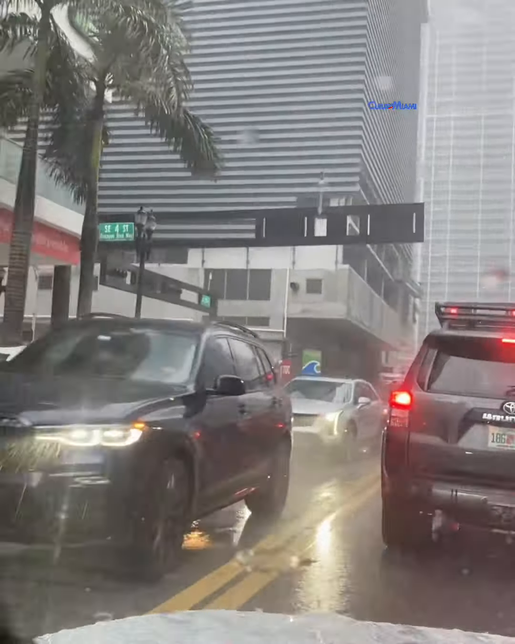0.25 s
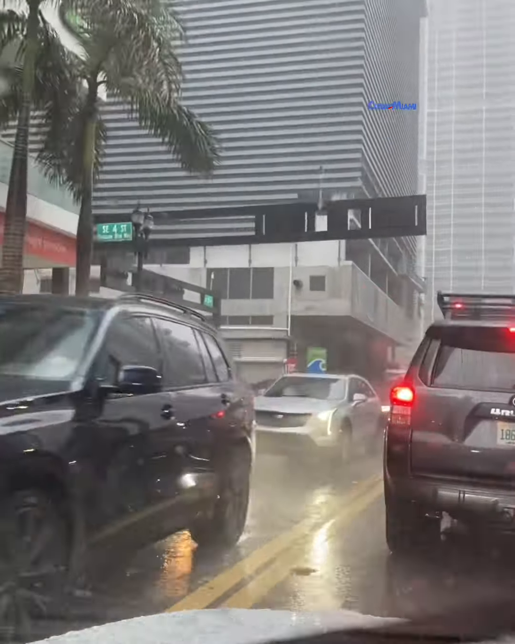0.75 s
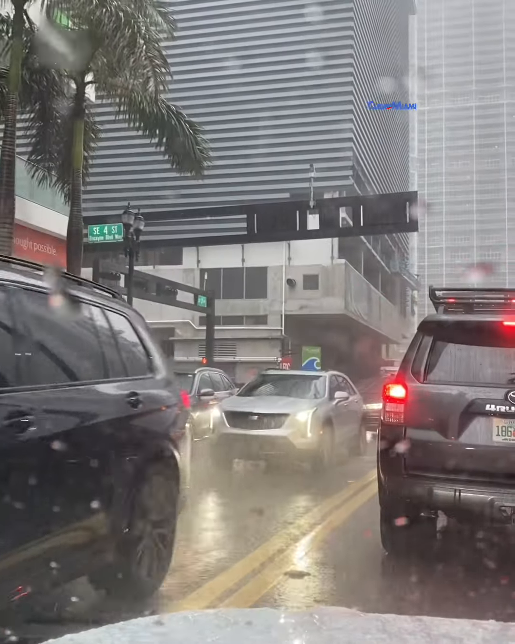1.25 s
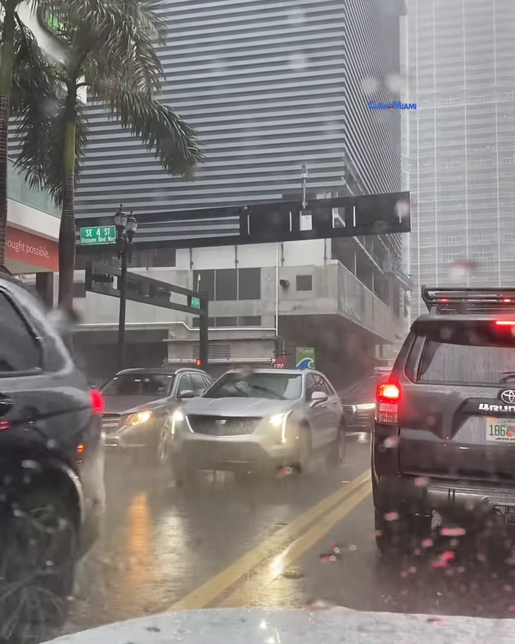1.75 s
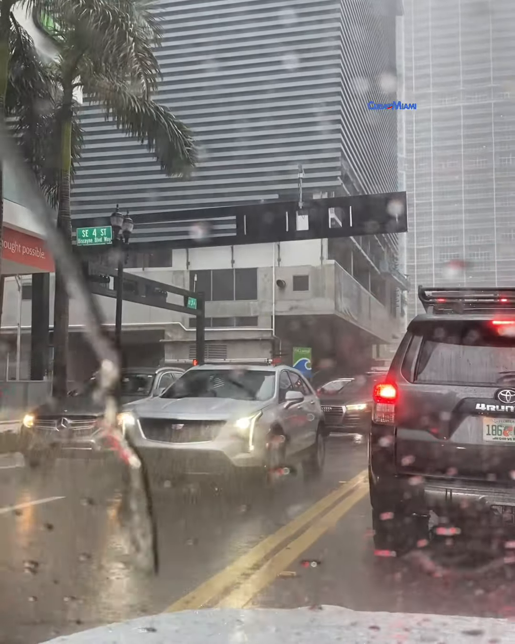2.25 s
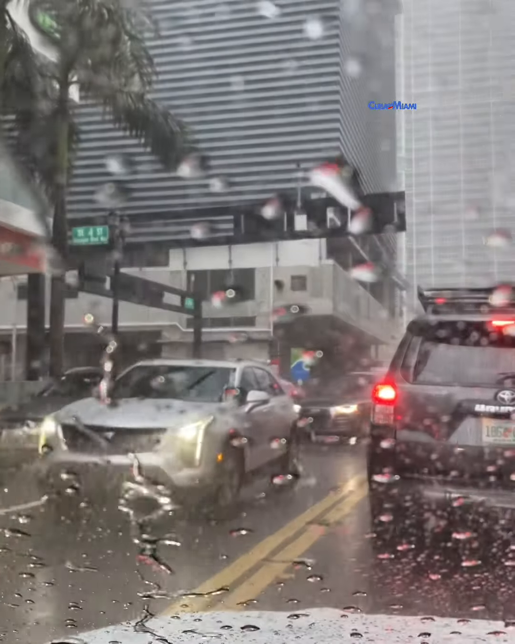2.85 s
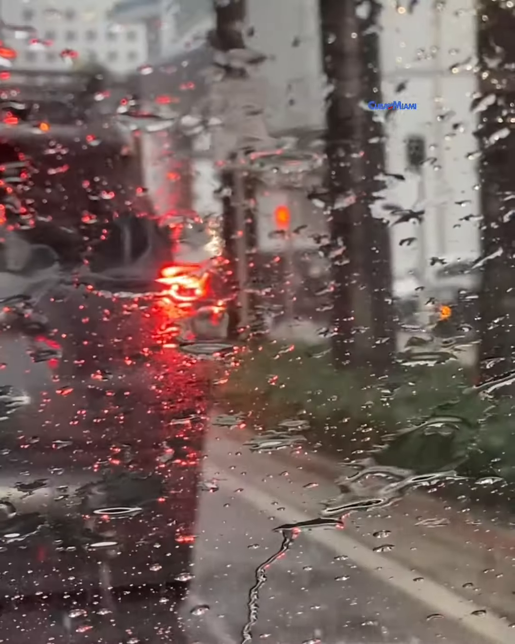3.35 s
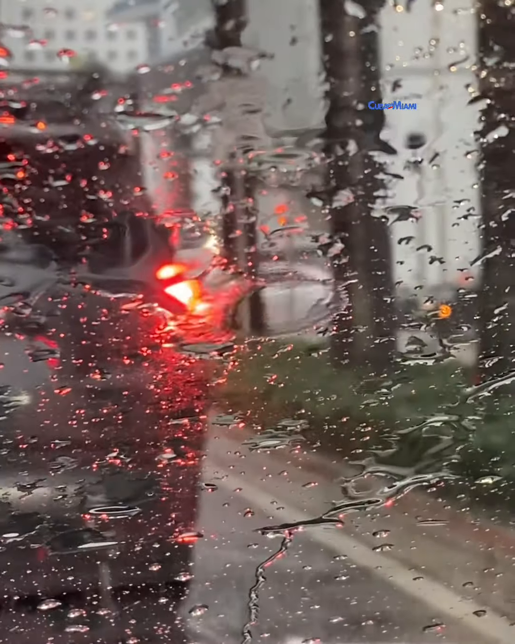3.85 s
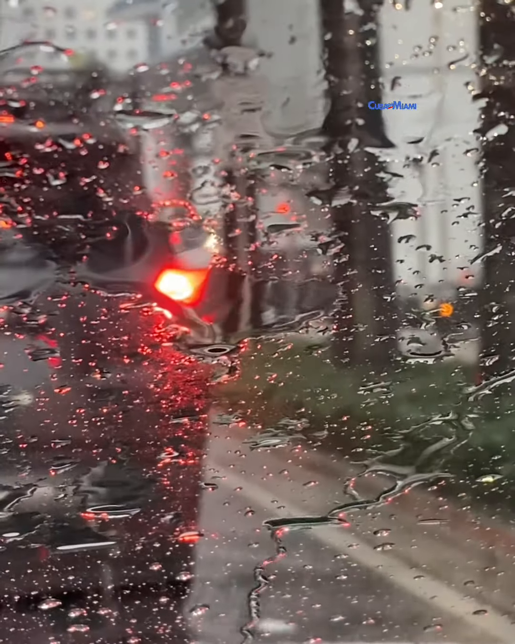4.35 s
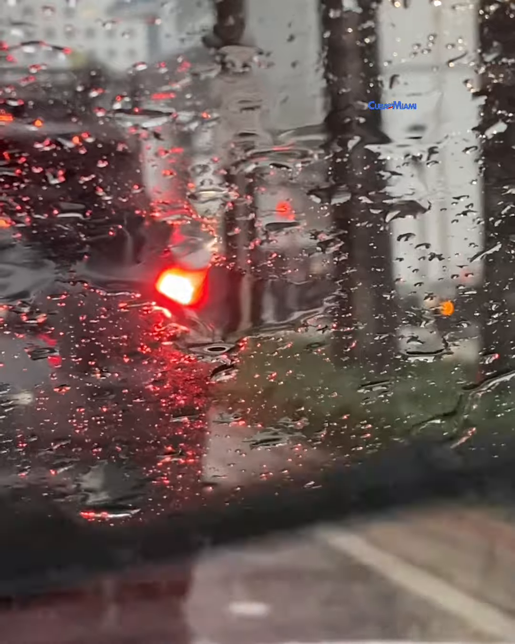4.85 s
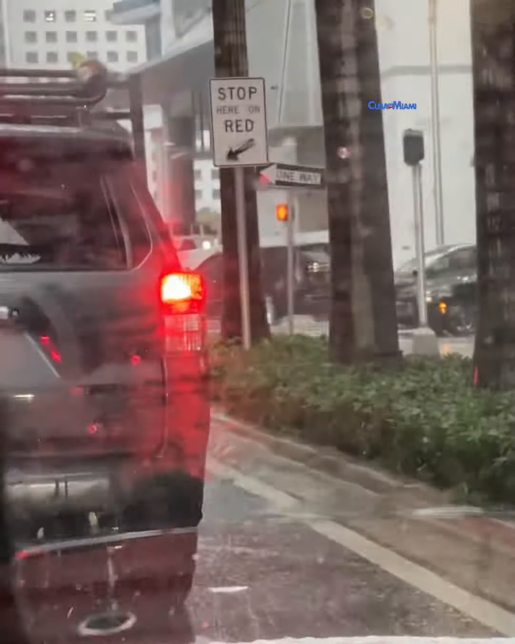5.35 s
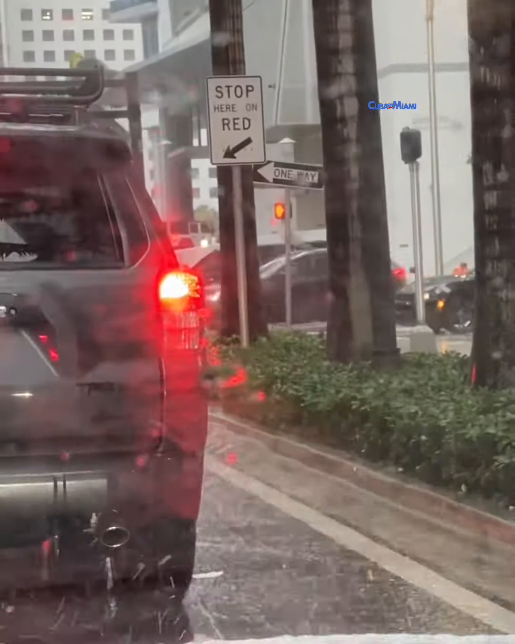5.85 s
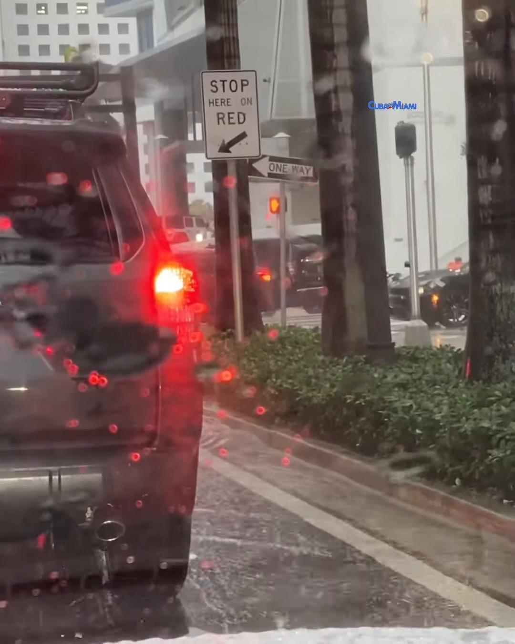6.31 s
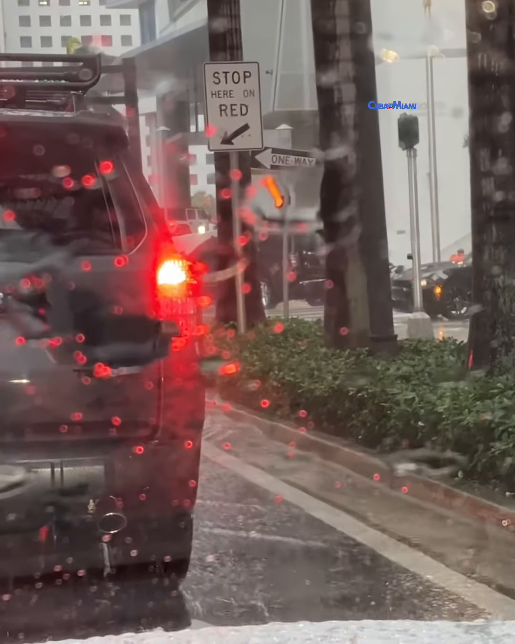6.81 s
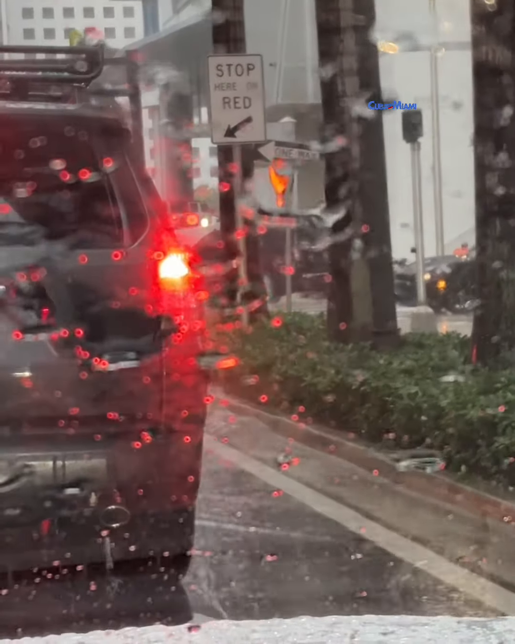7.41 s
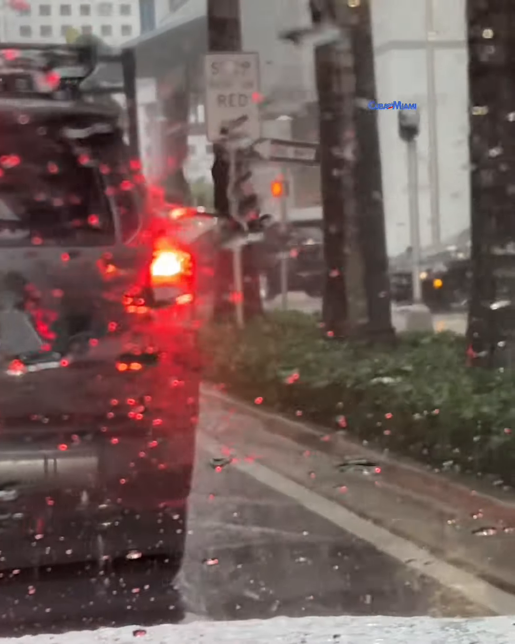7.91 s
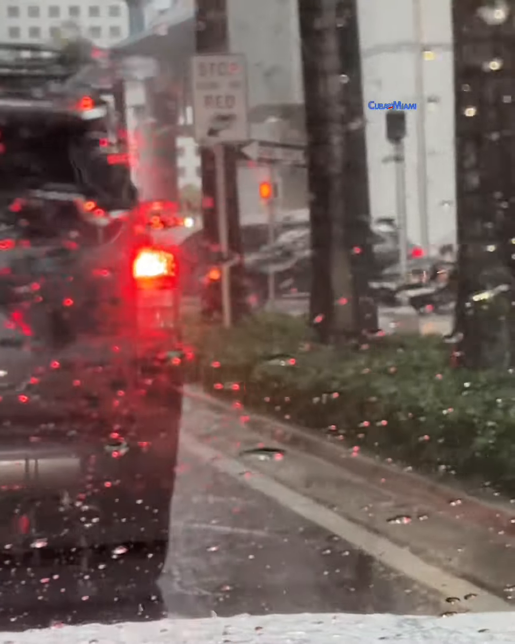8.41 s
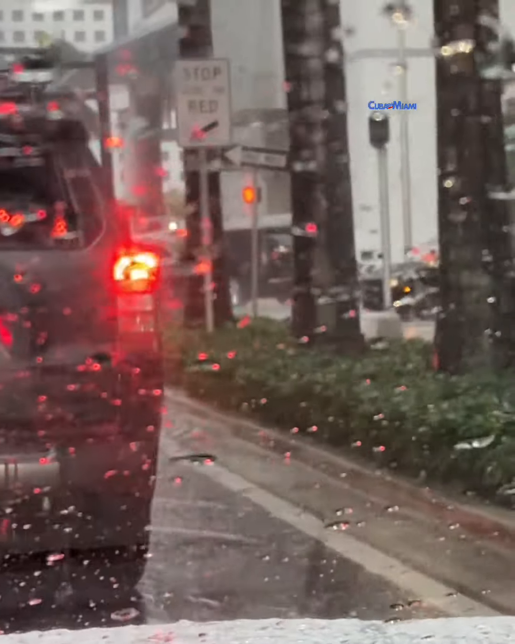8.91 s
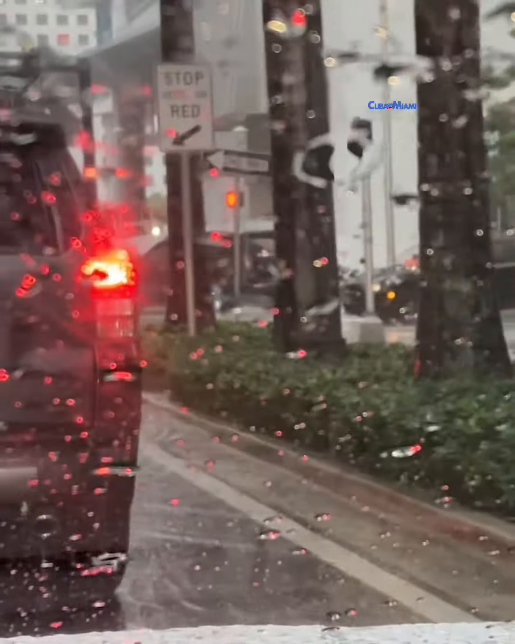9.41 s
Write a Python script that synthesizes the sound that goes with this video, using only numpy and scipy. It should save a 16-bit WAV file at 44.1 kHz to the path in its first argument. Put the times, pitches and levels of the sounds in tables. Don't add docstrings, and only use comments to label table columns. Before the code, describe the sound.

Heard inside a car in rainy traffic, with a close stereo microphone. From 0 to 3.1 s heavy rain makes a dense bright hiss on the windshield, with duller drumming on the roof panel, above a low cabin boom and idling engine. Wiper knocks come at about 0.25 and 0.5 s, the blade turning with a low double clunk and rubber slap, then a parking thump near 1.15 s. The rain swells from 2 s, with sharp fat splats around 2.1 s. At 3.1 s it cuts abruptly to a calmer scene: softer, thinner hiss, weaker rumble, individual ticks and splats. A deep wiper lift-off thud lands around 4.6 s, the turn clunks at 5.4 s, and parking thumps follow at 6 s; the hiss briefly brightens after 5.2 s. From 7 s rain thins to scattered ticks, small plinks and soft roof thuds until about 9.7 s.

```python
import sys
import numpy as np
from scipy import signal
from scipy.fft import rfft, irfft, next_fast_len
from scipy.io import wavfile
from scipy.ndimage import uniform_filter1d

SR = 44100
rng = np.random.default_rng(int(sys.argv[2]) if len(sys.argv) > 2 else 0)


def to_wav(sig):
    pcm = np.clip(np.atleast_2d(sig), -1, 1) * 32767
    pcm = np.round(pcm).astype(np.int16)
    wavfile.write(sys.argv[1], SR, pcm.T)


def convert_level_to_amplitude(level_db):
    exponent = np.asarray(level_db, float) / 20
    return 10 ** exponent


N = 426447
CUT_S = 3.102

# time_s, level_db
RAIN = [(0.0, -50), (1.25, -52.5), (2.1, -47), (2.7, -45.5), (3.1, -49.5), (3.105, -56.5), (3.37, -61.5),
        (3.4, -55), (4.3, -58.5), (4.45, -66), (4.74, -56.5), (5.18, -58.5), (5.23, -52.5), (6.2, -56),
        (7.04, -57.5), (7.1, -61.5), (7.7, -62.5), (9.67, -59.5)]
# frequency_hz, density_db
GLASS = [
    [(800, -12), (1500, -3), (2000, 3), (2800, 4), (3100, 2.5), (4000, 2), (6000, -2.5), (8000, -6),
     (10000, -10), (12500, -12.5), (14000, -19), (15500, -27.5)],
    [(800, -23), (1500, -5.5), (2000, 1), (2500, -0.5), (3100, 0), (4000, -2), (6000, -4.5), (8000, -8.5),
     (10000, -11), (12500, -15.5), (14000, -21), (15500, -29.5)],
]
# frequency_hz, density_db
ROOF = [
    [(120, -37), (200, -4.5), (296, -2.5), (393, -7.5), (437, -2.5), (471, -6), (518, -3.5), (711, -7),
     (842, -2), (986, -10), (1330, -9), (1880, -18), (2500, -22.5), (3250, -58), (5500, -120)],
    [(120, -64), (200, -2), (232, -10), (258, -3.5), (325, -8), (428, -6), (540, -6), (1060, -8.5),
     (1590, -13), (1800, -14), (2500, -24), (3250, -75), (5500, -120)],
]
# frequency_hz, density_db
BOOM = [
    [(12, -33), (20, -27), (37, 1), (54, 5.5), (81, 7.5), (103, 0.5), (156, 4.5), (193, -2.5), (296, -9.5),
     (344, -17.5), (400, -20), (520, -33), (880, -120)],
    [(12, -32), (22, -22), (31, -28), (38, 1), (46, 0), (56, 1.5), (81, -1.5), (102, -4.5), (150, -10),
     (198, -12), (258, -17.5), (400, -23.5), (520, -30.5), (880, -120)],
]

# start_s, peak_db,
# thud_below_splash_db
DROPS = [(0.1271, -29, -4), (0.1665, -32, -7), (0.2463, -32, -4), (0.7971, -36, -14), (0.8175, -29, -15),
         (1.0844, -32, -12), (1.1114, -32, -8), (1.1453, -36, -11), (1.2855, -33, -6), (1.3823, -40, -12),
         (1.4167, -38, -8), (1.4331, -28.5, -12), (1.5529, -32, -6), (2.0009, -40, -7), (2.0298, -35, -4),
         (2.0936, -27, -9.5), (2.1231, -23.5, -15), (2.363, -30, -6), (2.6589, -32, -5), (3.026, -30.5, -5),
         (3.1682, -37, -14), (3.3927, -35, -14.5), (3.5029, -34.5, -15), (3.5319, -32, -11.5),
              (3.6162, -35, -15), (3.7903, -35, -7.5), (3.8916, -40, -4), (4.0163, -43, -12),
              (4.0741, -33.5, -11), (4.1255, -37.5, -7.5), (4.3455, -42, -12), (4.5173, -40.5, -10),
              (4.5555, -35.5, -14), (4.6274, -41, 2.5), (4.7197, -38.5, -14), (4.7651, -42, -10),
              (4.8653, -36.5, -18), (5.218, -38, -5), (5.3812, -37, -15), (5.5383, -41, -6),
              (5.6715, -38.5, -5), (5.8007, -40, -6), (5.9993, -37, -7.5), (6.1305, -39, -11),
              (6.1659, -36, -13), (6.2148, -42, -6), (6.3754, -38, -9), (6.4293, -39, -10),
              (6.5959, -40, -6), (6.9462, -35.5, -16),
         (7.1451, -39, -6), (7.1855, -36.5, -11), (7.2279, -47, -12), (7.283, -37, -12),
              (7.4839, -44.5, -8), (7.5747, -45, -12), (7.661, -39.5, -7), (7.7717, -50, -14),
              (7.7832, -40.5, -15), (7.8251, -35, -16), (7.9244, -37.5, -7.5), (7.9622, -40.5, -8),
              (8.0117, -41, -6.5), (8.327, -40.5, -6), (8.5458, -34.5, -13), (8.7894, -44, -12),
              (8.7974, -34, -17), (8.9657, -38.5, -6.5), (9.0129, -42, -9), (9.1072, -41.5, -6),
              (9.242, -37, -13), (9.2713, -41, -6), (9.2848, -32, -10), (9.3426, -38.5, -9.5),
              (9.3701, -41, -11), (9.387, -32, -15), (9.5771, -40, -11), (9.5963, -36, -7)]
# start_s, peak_db, t60_s
FAT_DROPS = [
    (2.488, -28, 0.053),
    (6.601, -40, 0.07),
    (6.858, -41, 0.2),
    (6.885, -40, 0.15),
    (7.004, -36.5, 0.11),
    (9.392, -43, 0.058),
]
# start_s, peak_db, pitch_hz, ring_s
DRIPS = [
    (6.8096, -54, 1940, 0.006),
    (6.832, -45, 1840, 0.0039),
    (9.273, -51, 1750, 0.006),
]

# turn_s, strength_db
WIPES = [
    (.469, -1.5),
    (5.366, -2.0),
]
# from_turn_s, peak_db, t60_s
SLAPS = [
    (-.834, -35.5, .15),
    (-.728, -30, 0.094),
    (-.226, -29, 0.14),
    (-.002, -25, .06),
    (.659, -33, 0.048),
]
# from_turn_s, peak_db, pitch_hz, ring_s
SHELL_KNOCKS = [(-.836, -29, 74, .018), (-.766, -26, 74, .013), (-.725, -11, 91.6, .015),
                (-.656, -24, 98, 0.021), (-.586, -25, 63, 0.018), (-.535, -28, 68, 0.0074),
                (-.496, -28, 60, .013), (-.34, -28, 91.6, 0.022), (0.0, -19, 79, 0.011),
                (.02, -16.5, 87, 0.012), (.061, -20.5, 86, .011), (.103, -25.5, 81, 0.019),
                (.643, -25.5, 81.3, 0.015), (.672, -20, 72.3, 0.0094), (.695, -20, 77, 0.01),
                (.72, -25.5, 62, 0.013), (.773, -30, 53.3, 0.033), (.177, -32.5, 105.4, 0.02),
                (-.27, -30, 72, 0.013)]
# from_turn_s, peak_db, pitch_hz, ring_s
GLASS_KNOCKS = [
    (-.81, -25.5, 151, .0075),
    (-.787, -28.5, 161, .01),
    (-.731, -24.5, 157, .0063),
    (-.226, -27, 176, 0.0084),
    (-.002, -23.5, 165, 0.008),
    (.015, -18.5, 162, 0.0082),
    (.044, -25.5, 169, .0061),
    (.659, -22.5, 131, 0.0071),
]
# from_turn_s, peak_db, pitch_hz, ring_s
BLADE_KNOCKS = [
    (-.835, -34.5, 294, 0.004),
    (-.731, -37, 160, .0044),
    (-.728, -34, 420, 0.0058),
    (-.223, -30, 244, 0.0025),
    (-.003, -23.5, 259, 0.0067),
    (.007, -19.5, 234, 0.0051),
]

# frequency_hz, likeness_0_to_1
LIKENESS = [
    [(60, 1), (150, 1), (270, 0.95), (450, 0.68), (700, 0.22), (1500, 0.16), (4500, 0), (5500, 0.71),
     (7000, .84), (15000, 1)],
    [(60, 1), (150, 1), (270, 0.96), (450, 0.6), (700, 0.33), (1700, 0.3), (2100, 0.7), (3500, .9),
     (4300, .7), (5200, .85), (7000, 0.86), (15000, 0.7)],
]
# frequency_hz, left_over_right_db
LEFT_TILT = [(150, 0), (380, 1), (700, 2), (1300, 2), (2400, .3), (4000, 0)]


def glass(gusts):
    wash = by_shot(2.15, 1.73)
    drops = patter(500, 3.95, 0.023, wash) * gusts
    return convert_level_to_amplitude(4.5 + rain_db()) * coloured(drops * patchy(1.42), GLASS)


def roof(gusts):
    drops = patter(300, 3.15, 0.039, 2.2) * gusts
    strength = convert_level_to_amplitude(2.5) * level((-46, -50), share=0.69, motor_db=1)
    return strength * coloured(drops * patchy(1.16), ROOF)


def splats():
    noise, clicks = rng.standard_normal((2, N)), np.zeros(N)
    bright = [[(hz, db + 2.5 * np.log2(hz / 3000)) for hz, db in spectrum] for spectrum in GLASS]

    drops = DROPS + stray_drops()
    start_s, peak_db = np.transpose(drops)[:2]
    clicks[(start_s * SR).astype(int)] = convert_level_to_amplitude(peak_db)
    tick = convert_level_to_amplitude(4.5) * clicks.std() * coloured(clicks, bright)

    drop_t60_s = 0.041
    spray = bursts([(s, db - 10.5, drop_t60_s) for s, db, _ in drops])
    thuds = [(s, db + 1.35 * min(thud_db, -5.0) + 2.5, 2.1 * drop_t60_s) for s, db, thud_db in drops]
    thuds += [(s, db - 1.5, t60_s) for s, db, t60_s in FAT_DROPS]
    return tick + spray * coloured(noise, bright) + bursts(thuds) * coloured(noise, ROOF)


def stray_drops():
    per_s, over_hiss_db, spread_db = 4, 14, 2.5
    wait, size, dull = rng.random((200, 3)).T
    start_s = np.cumsum(-np.log(wait) / per_s)
    peak_db = np.interp(start_s, *np.transpose(RAIN)) + over_hiss_db - spread_db * np.log(size + .05)
    rows = zip(start_s, peak_db + 2, -8 - 8 * dull)
    return [row for row in rows if CUT_S < row[0] < N / SR]


def plinks(count=900):
    out, t = np.zeros((2, N)), np.arange(900) / SR
    for when, pitch, size, side in rng.random((count, 4)):
        hz = 900 * 5.5 ** pitch
        decay_db = -60 * t * hz / 45
        ring = convert_level_to_amplitude(-4.0 * np.log(size + .01) + decay_db) * np.sin(2 * np.pi * hz * t)
        part = out[:, int(when * N):][:, :len(t)]
        part += np.outer([np.cos(side), np.sin(side)], ring)[:, :part.shape[1]]
    return convert_level_to_amplitude(rain_db() - 6.5) * out


def slaps():
    panel = [(120, -55), (250, 6), (400, 0), (700, -18.0), (1500, -33), (3000, -60)]  # frequency_hz, density_db
    noise, blows = rng.standard_normal((2, N)), swept(SLAPS)
    puff = uniform_filter1d(bursts(blows), size=200)
    shudder = bursts([(s, db - 4.5, t60_s + 0.23) for s, db, t60_s in blows])
    shudder = uniform_filter1d(shudder, size=400)
    return convert_level_to_amplitude(-5.5) * puff * coloured(noise, [panel, panel]) + shudder * coloured(noise, BOOM)


def wipers():
    out, t = np.zeros(N), np.arange(12000) / SR
    for start_s, peak_db, hz, ring_s in swept(SHELL_KNOCKS + GLASS_KNOCKS + BLADE_KNOCKS) + DRIPS:
        age = t / max(ring_s, .003)
        swell = (age * np.exp(1 - age)) ** 1.28
        knock = convert_level_to_amplitude(peak_db) * swell * np.sin(2 * np.pi * hz * t)
        part = out[round(start_s * SR):][:len(t)]
        part += knock[:len(part)]
    return out


def boom():
    firing_hz, firing_db = 32, -43
    tone = convert_level_to_amplitude(firing_db) * np.sin(2 * np.pi * firing_hz * np.arange(N) / SR)
    strength = convert_level_to_amplitude(1.0) * level((-39.5, -41.5), share=0.17, motor_db=5.0)
    return strength * coloured(patchy(0.59, 43, 2.5), BOOM) + by_shot(tone, 0)


def rain_db():
    return np.interp(np.arange(N) / SR, *np.transpose(RAIN))


def level(shot_db, share, motor_db):
    middling_rain_db = -54
    t = np.arange(N) / SR
    motor_s = [-0.69, -0.49, 0.48]
    effort = sum(np.interp(t - turn_s, motor_s, [0, 1, 0]) for turn_s, _ in WIPES)
    return convert_level_to_amplitude(by_shot(*shot_db) + share * (rain_db() - middling_rain_db) + motor_db * effort)


def swept(rows):
    return [(turn_s + s, db + strength_db, *rest)
            for turn_s, strength_db in WIPES for s, db, *rest in rows if turn_s + s > 0]


def patter(per_s, spread_db, t60_s, wash):
    chance = rng.random((N, 2))
    size = convert_level_to_amplitude(spread_db * np.minimum(-np.log(chance[:, 0] + 1e-9), 5))
    size = size * (chance[:, 1] < per_s / SR)
    power = dying(size ** 2, t60_s)
    return np.sqrt(power / power.mean() + wash)


def dying(power, t60_s):
    return signal.lfilter([1], [1, -np.exp(-2 * np.log(1000) / (t60_s * SR))], power)


def bursts(rows):
    power, t = np.zeros(N), np.arange(12000) / SR
    for start_s, peak_db, t60_s in rows:
        part = power[round(start_s * SR):][:len(t)]
        decay_db = -60 * t / np.clip(t60_s, .003, .3)
        part += convert_level_to_amplitude(2 * (peak_db + decay_db))[:len(part)]
    return np.sqrt(power)


def patchy(depth_db, frames=12, bins=8):
    a, b, c, d, patches = rng.standard_normal((N // 128 + 5, 257, 5)).T
    patches = uniform_filter1d(patches, int(bins), 0)
    patches = evened(uniform_filter1d(patches, int(frames), 1))
    z = np.array([a + 1j * b, c + 1j * d]) * convert_level_to_amplitude(depth_db * patches)
    return evened(signal.istft(z, nperseg=512, noverlap=384)[1][:, :N])


def coloured(x, spectra):
    size = next_fast_len(N)
    z, hz = rfft(x, size), np.fft.rfftfreq(size, 1 / SR)
    shots = [evened(irfft(z * convert_level_to_amplitude(read(spectrum, hz)), size)[..., :N]) for spectrum in spectra]
    return by_shot(*shots)


def evened(x):
    return x / np.sqrt(np.mean(x ** 2) + 1e-20)


def read(points, hz):
    f, value = np.transpose(points)
    return np.interp(np.log(hz + 1), np.log(f + 1), value)


def by_shot(first, second):
    return np.where(np.arange(N) < CUT_S * SR, first, second)


def ports(pair):
    turn_from_hz, full_turn_hz = 4300, 6100
    size = next_fast_len(N)
    (near, other), hz = rfft(pair, size), np.fft.rfftfreq(size, 1 / SR)
    lead = np.exp(-2j * np.pi * np.maximum(hz - turn_from_hz, 0) / full_turn_hz)
    tilt = convert_level_to_amplitude(read(LEFT_TILT, hz) / 2)
    right = []
    for points in LIKENESS:
        same = np.clip(read(points, hz), 0, 0.999)
        blend = same * lead * near + np.sqrt(1 - same ** 2) * other
        right.append(irfft(blend / tilt, size)[:N])
    return np.array([irfft(near * tilt, size)[:N], by_shot(*right)])


def scene():
    gusts = evened(patter(28, 3.1, 0.16, by_shot(4.77, 3.7)))
    rain = glass(gusts) + roof(gusts) + splats() + plinks()
    return ports(rain + slaps() + wipers() + boom())


def top_cut(x):
    return signal.sosfilt(signal.butter(12, 16940, fs=SR, output="sos"), x)


def record(dry):
    return top_cut(dry)


dry = scene()
out = record(dry)
to_wav(out)
```